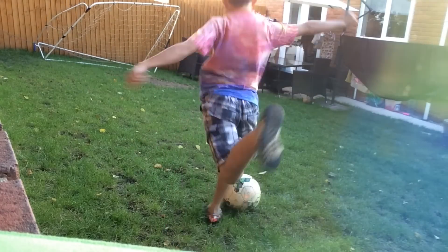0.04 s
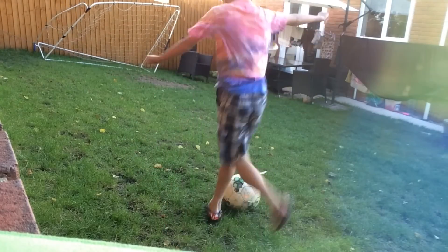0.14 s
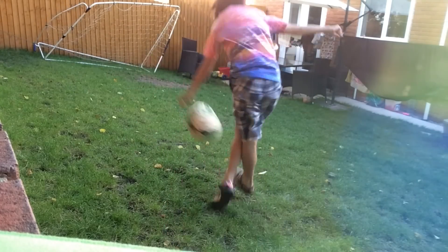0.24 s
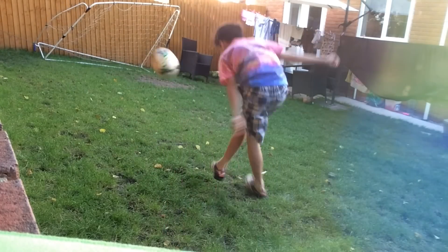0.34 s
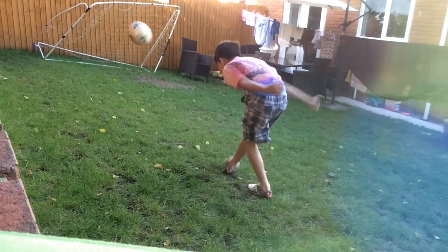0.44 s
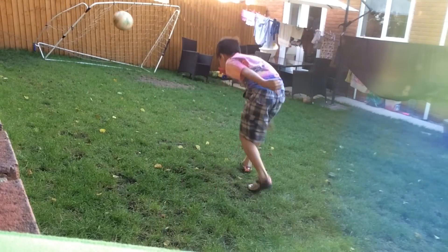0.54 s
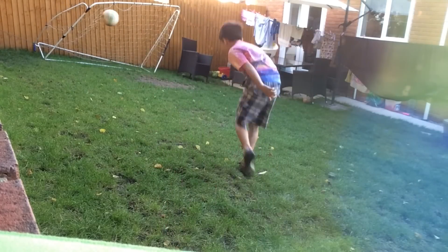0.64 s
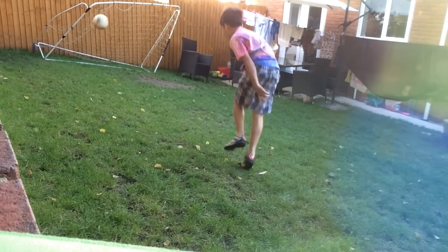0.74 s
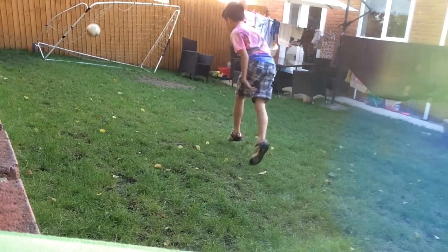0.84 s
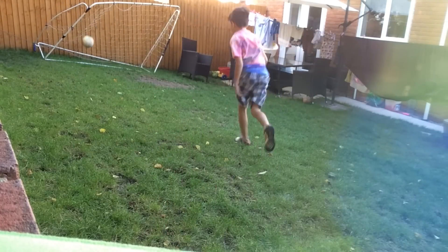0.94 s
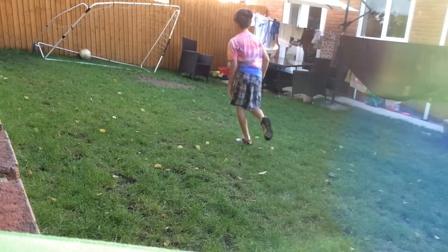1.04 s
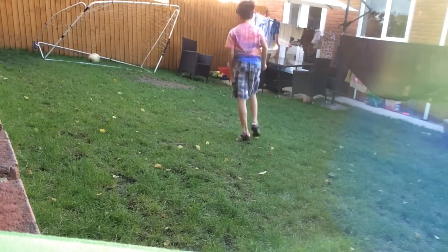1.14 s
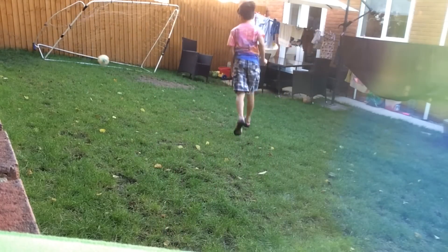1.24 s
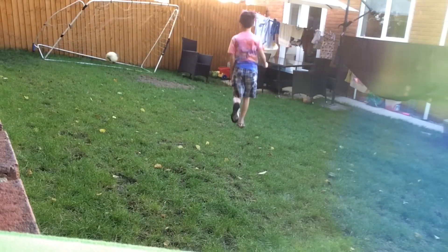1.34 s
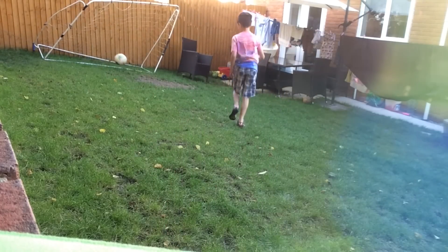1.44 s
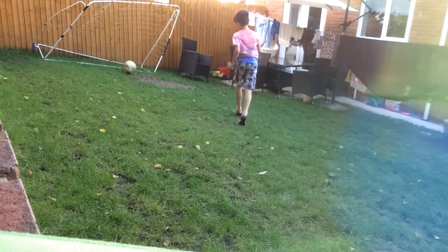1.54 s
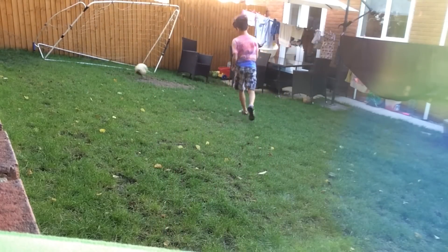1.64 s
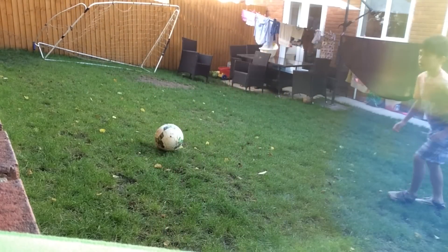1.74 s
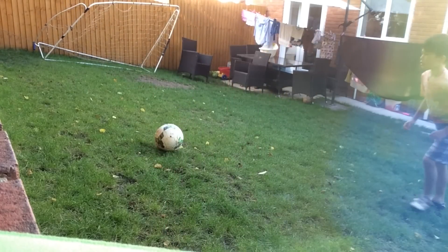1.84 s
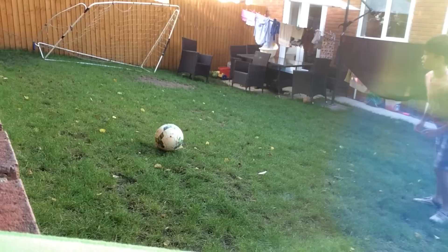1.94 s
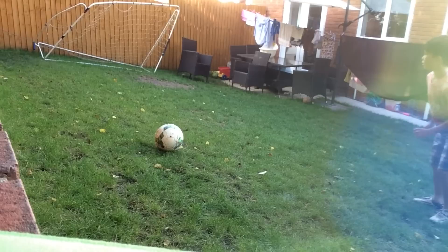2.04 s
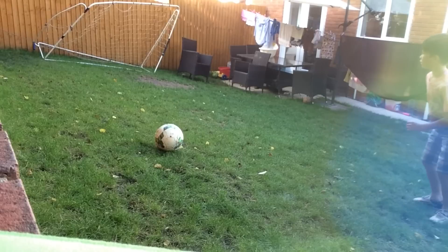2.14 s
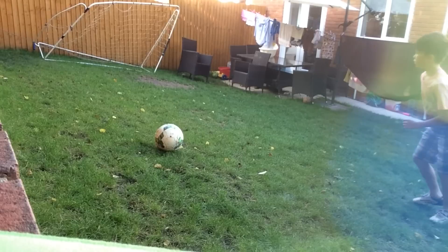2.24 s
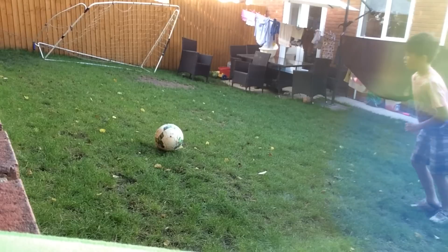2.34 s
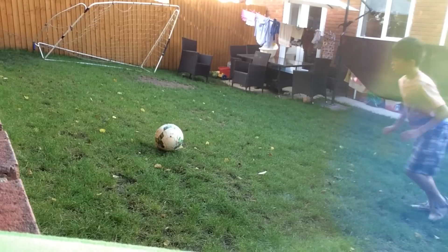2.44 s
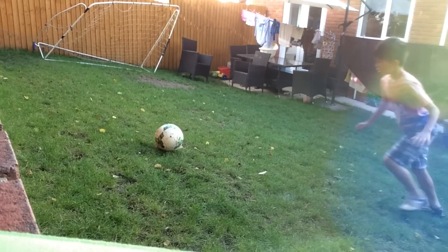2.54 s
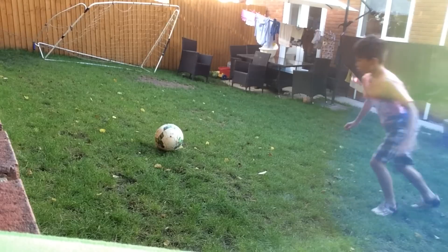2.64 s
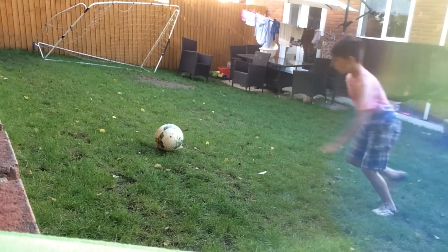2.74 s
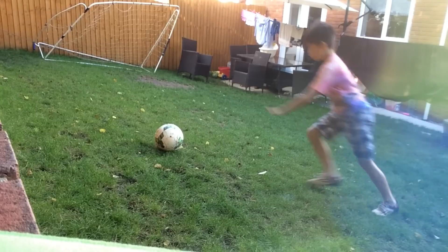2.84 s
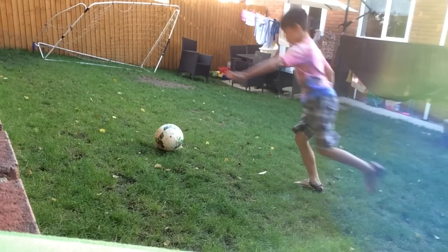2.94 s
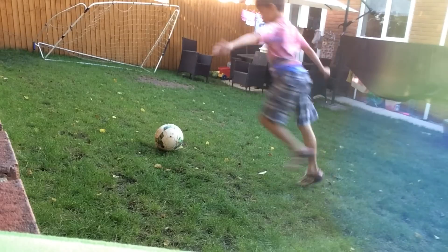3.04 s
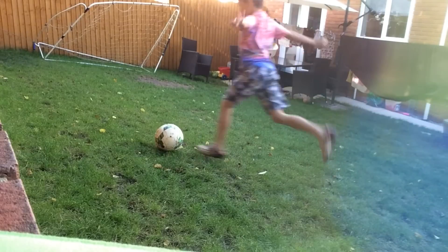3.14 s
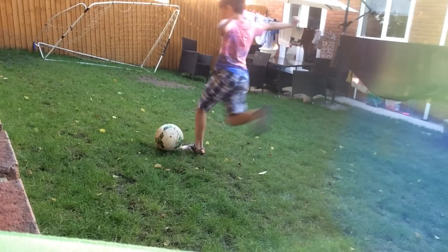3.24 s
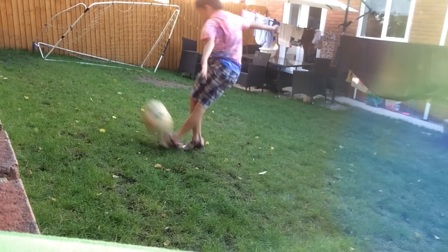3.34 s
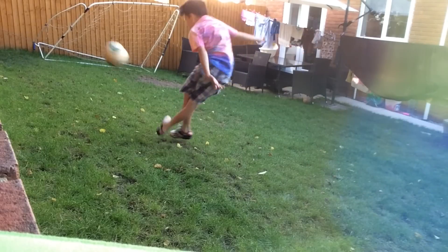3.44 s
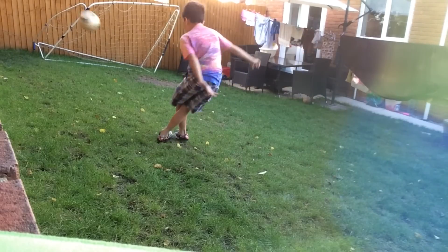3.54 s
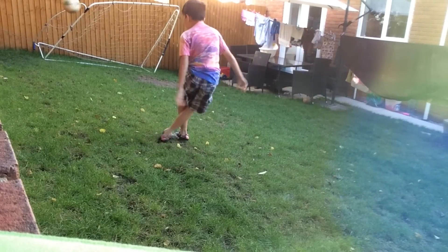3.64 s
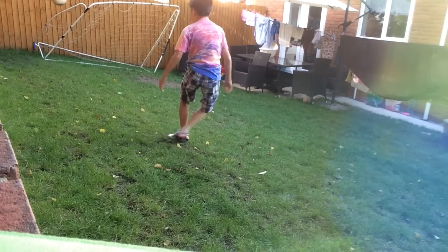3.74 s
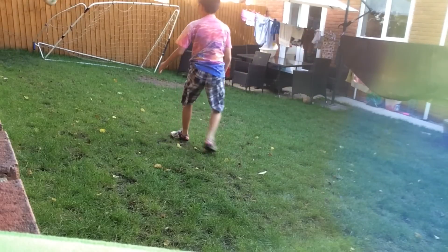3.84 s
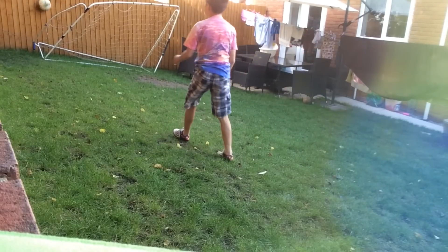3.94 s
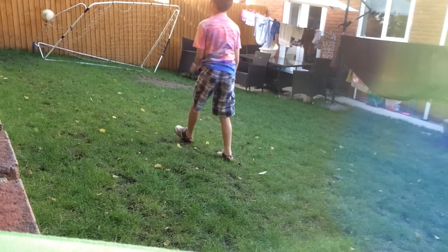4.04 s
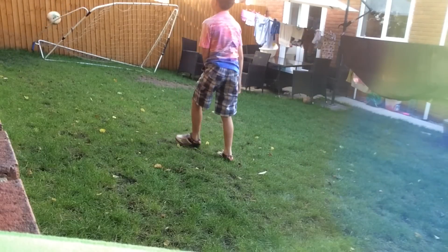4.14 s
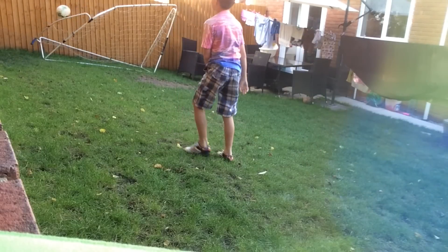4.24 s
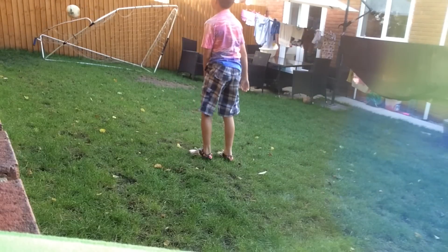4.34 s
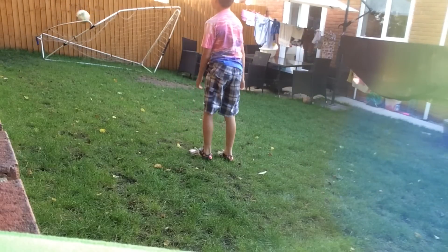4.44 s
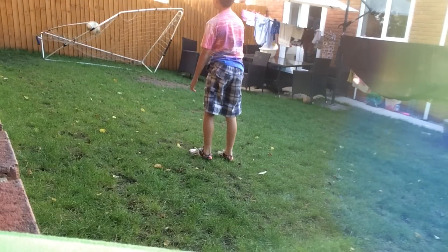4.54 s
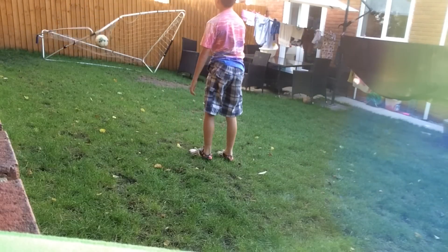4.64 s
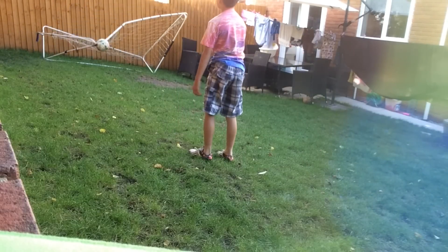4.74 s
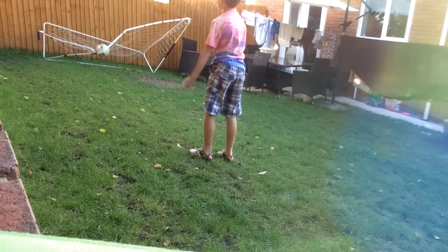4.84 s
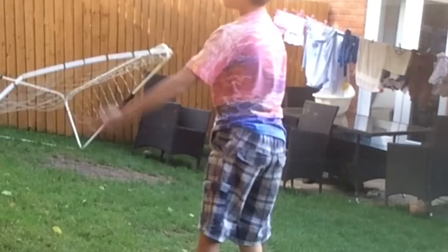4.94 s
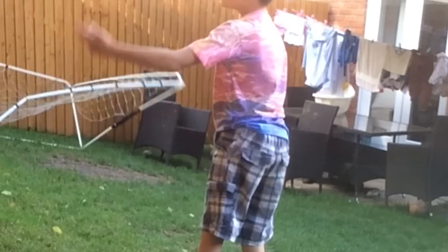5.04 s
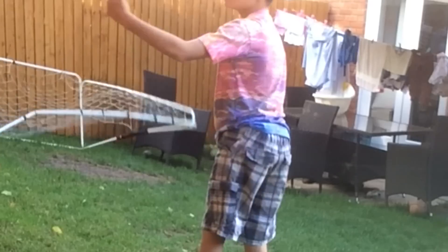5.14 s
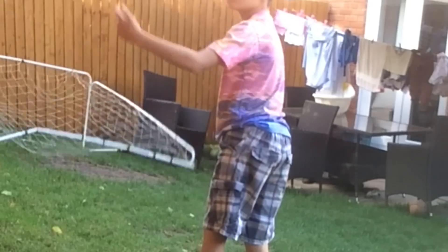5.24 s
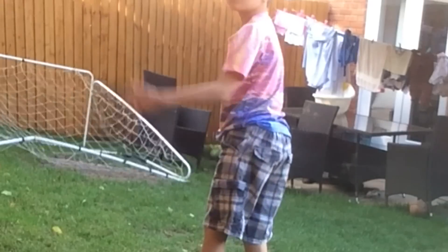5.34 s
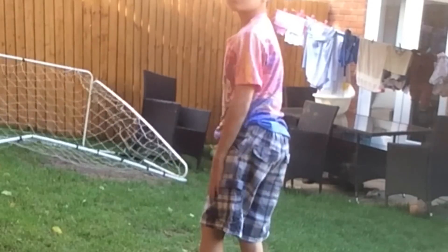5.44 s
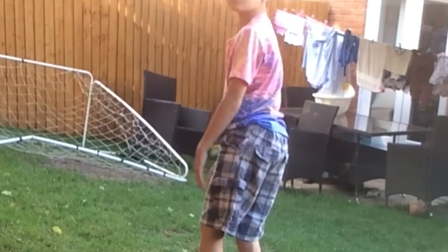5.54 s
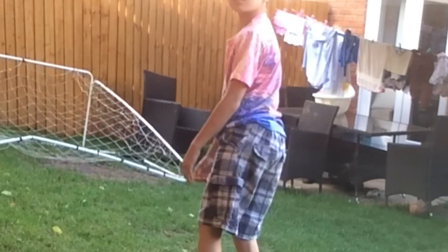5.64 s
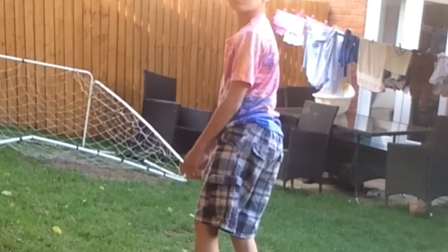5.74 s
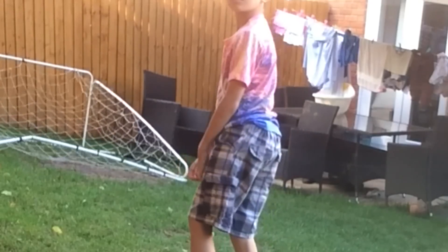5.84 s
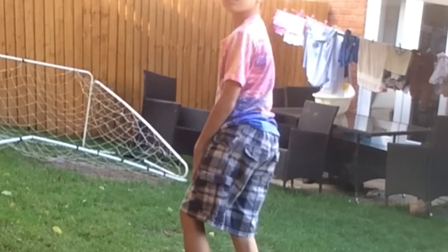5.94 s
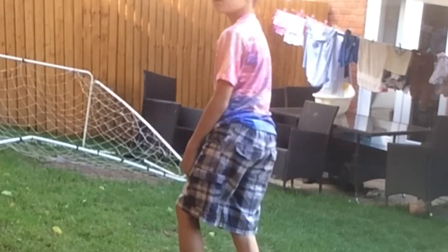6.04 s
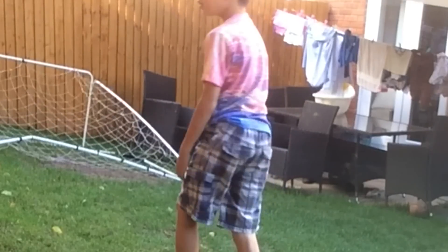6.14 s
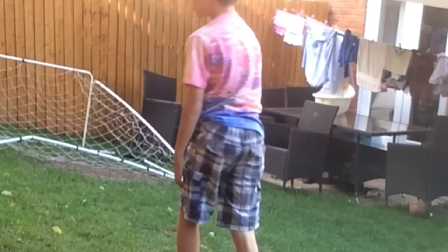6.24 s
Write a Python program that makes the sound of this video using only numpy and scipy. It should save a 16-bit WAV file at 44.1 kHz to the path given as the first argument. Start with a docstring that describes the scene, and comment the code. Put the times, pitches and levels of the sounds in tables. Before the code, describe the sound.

Soft footfalls on a lawn open the scene, and at 0.3 seconds a football is kicked a few metres away with a loud, leathery punch. The ball swishes through a net at about 1 second and bangs into a wooden fence at 1.2, the boards booming and chattering briefly. Quiet steps and grass rustles follow, with a heel scuff near 3 seconds. A second hard kick lands at 3.4, and the fence booms and rattles again at 4.1. The ball drops onto a light plastic goal with a swish of netting at 4.2; the goal creeps over with small ticks, then topples with scrapes and hollow clacks between 5.1 and 5.6 seconds. Walls and fences add a short echo. A faint town hum runs underneath, with two faint low toots, at the start and at 2.5 seconds, and barely audible bird whistles near 2.4 and 5.9.

```python
"""Soft footfalls on a back-garden lawn, then the punch of a football kicked a few metres away. The ball
brushes a net and bangs into a wooden fence, whose boards boom and chatter. A heel scuffs; kicked again,
the ball hits the fence and drops onto a light plastic goal, which topples with hollow clacks and scrapes.
Walls and fences echo; behind it all are two faint birds, two low toots and the hum of a town. The level
dips briefly between the kicks."""
import sys
import numpy as np
from scipy import signal
from scipy.fft import rfft, irfft
from scipy.io import wavfile
from scipy.ndimage import uniform_filter1d

SR = 44100
rng = np.random.default_rng(int(sys.argv[2]) if len(sys.argv) > 2 else 0)


def materialize(psi):
    """Save the field psi as 16-bit PCM at rate SR to the path in sys.argv[1].

    A 1-D psi becomes a single channel; in a 2-D psi each row is a channel.
    """
    bounded = np.clip(np.atleast_2d(psi).T, -1, 1)
    quanta = np.round(bounded * 32767).astype(np.int16)
    wavfile.write(sys.argv[1], SR, quanta)


N = 277830
T = np.arange(N) / SR

# boot meets ball: (time [s], level [dB], crack [dB])
KICKS = [(0.2769, -6, -28.5), (3.4356, -5.5, -27)]
# feet, ball and goal frame land on turf: (time [s], level [dB], pitch [Hz], scuff [dB], grass [dB])
LANDINGS = [(0.121, -36.5, 340, -50.5, -49.5), (0.134, -27.5, 105, -63, -78), (0.245, -43, 83.4, -44, -57),
            (0.459, -35.5, 72, -61, -63), (1.041, -41.5, 163, -54.5, -65.5), (1.699, -42, 287, -59, -68),
            (2.756, -32.5, 107.2, -55.5, -61.5), (2.98, -30.5, 426, -41, -54.5), (2.989, -33, 82, -62, -57),
            (3.011, -39, 79, -63, -71), (3.315, -36, 86, -56, -59.5), (3.599, -26.5, 93, -46, -54.5),
            (5.155, -36, 160, -52.5, -63.5), (5.436, -32.5, 255, -46.5, -50),
            (5.556, -33, 93.6, -44.5, -56)]
LEAF_HZ = 10700  # thin blades and cords give little above this


def undb(db):
    return 10 ** (np.asarray(db) / 20)


def unit(x):
    return x / np.sqrt(np.mean(x ** 2))


def add(out, x, s):
    """Mix x into out from time s on."""
    i = int(s * SR)
    out[i:i + len(x)] += x[:N - i]


def fade(t60, size):
    return 10 ** (-3 * np.arange(size) / SR / max(t60, .002))


def ring(modes, size):
    """Sum of decaying modes after an instant blow."""
    t = np.arange(size) / SR
    return sum(undb(db) * fade(t60, size) * np.sin(2 * np.pi * hz * t) for hz, db, t60 in modes)


def push(x, contact_ms):
    """A softer contact pushes for longer and dulls the ring; peak 1."""
    y = signal.fftconvolve(x, np.hanning(int(contact_ms * SR / 1000) + 3))
    return y / np.abs(y).max()


def colour(gain, size):
    """Noise of rms 1 with the given gain against frequency."""
    hz = np.maximum(np.fft.rfftfreq(size, 1 / SR), 1)
    return unit(irfft(rfft(rng.standard_normal(size)) * gain(hz), size))


def shape(table):
    """Gain against frequency from (frequency [Hz], level [dB]) points."""
    hz, db = np.transpose(table)
    return lambda f: undb(np.interp(np.log(f), np.log(hz), db))


def hump(centre_hz, octaves):
    return lambda f: np.exp(-.5 * (np.log2(f / centre_hz) / octaves) ** 2)


def walk(rate_hz, size):
    """Slewed random levels with a spread near 1."""
    hold = int(SR / rate_hz)
    steps = np.repeat(rng.standard_normal(size // hold + 1), hold)
    return 1.09 * uniform_filter1d(steps, hold)[:size]


def burst(rise, t60, centre_hz, octaves, size):
    """Noise that swells, then dies away."""
    n = int(rise * SR)
    envelope = np.r_[np.hanning(2 * n)[:n], fade(t60, size - n)]
    return envelope * colour(hump(centre_hz, octaves), size)


def rustle(db, rise, t60, centre_hz, octaves):
    """Grainy hiss of blades or cords sliding and snapping, singly and in tufts."""
    size = SR // 2
    grain_db = 2 * walk(1500, size) - .5 * walk(140, size)
    return undb(db + grain_db) * burst(rise, t60, centre_hz, octaves, size)


def whistles(notes):
    """Gliding tones, blurred and fluttering over the distance."""
    out = np.zeros(N)
    for s, length, first_hz, last_hz, db in notes:
        n = int(length * SR)
        hz = np.linspace(first_hz, last_hz, n) * (1 + .0102 * walk(40, n))
        flutter = walk(.02 * first_hz, n) + 1j * walk(.02 * first_hz, n)
        tone = (flutter * np.exp(2j * np.pi * np.cumsum(hz) / SR)).imag
        add(out, undb(db) * np.sqrt(np.hanning(n)) * tone, s)
    return out


def town():
    """A bed of far traffic and air: narrow bands swell together and flicker alone, most in the mids."""
    # tone of the hum: (frequency [Hz], level [dB])
    spectrum = [(12, -36), (20, -17), (60, 1), (113, -5.5), (172, -15), (262, -18), (285, -20), (388, -18),
                (422, -21.5), (897, -26), (2530, -37), (13900, -46.5), (16000, -51.5)]
    # slow ride of the bed: (time [s], level [dB])
    ride = [(0, -56), (.9, -57), (1.7, -53.5), (2.0, -56.5), (2.6, -57), (4.0, -55), (5.0, -57.5),
            (5.7, -57), (6.3, -57)]
    out, swell_db = np.zeros(N), 1.3 * walk(1.4, N)
    hz = np.maximum(np.fft.rfftfreq(N, 1 / SR), 1)
    hum = rfft(rng.standard_normal(N)) * shape(spectrum)(hz)
    for octave in np.arange(4, 14.6, 1 / 3):
        band = np.clip(1 - 3 * np.abs(np.log2(hz) - octave), 0, 1)
        flicker_db = 2.9 * hump(500, 2.6)(2 ** octave) * walk(4.9, N)
        out += irfft(hum * band, N) * undb(swell_db + flicker_db)
    return unit(out) * undb(np.interp(T, *np.transpose(ride)))


def toots():
    """Two faint low toots, each sagging in pitch."""
    # toots: (time [s], length [s], first pitch [Hz], last pitch [Hz], level [dB])
    notes = [(0.0, 0.052, 513, 450, -56), (2.46, 0.12, 482.6, 442, -62.5)]
    return whistles(notes)


def grass():
    """Blades bend just ahead of each landing and kick, and hiss under dragged soles."""
    # soles drag over grass: (time [s], level [dB], rise [s], t60 [s])
    drags = [(.52, -59.5, .005, 0.62), (.58, -62.5, .04, .3), (1.685, -60.5, 0.042, 0.2),
             (1.86, -66, .039, 0.66), (2.011, -62, .03, 0.21), (3.13, -68.5, .03, .12),
             (3.831, -68.5, .017, .14), (3.976, -58.5, .005, 0.21), (6.102, -73, .03, 0.27)]
    treads = [(s - .01, db, .01, .11) for s, *_, db in LANDINGS]
    boot_sweeps = [(s - .015, -46.5, .01, .23) for s, *_ in KICKS]
    out = np.zeros(N)
    for s, db, rise, t60 in treads + boot_sweeps + list(drags):
        add(out, rustle(db, rise, t60, centre_hz=5500, octaves=6), s)
    tufts = undb(1.8 * walk(70, N))  # the lawn gives way unevenly
    return signal.lfilter(*signal.butter(1, LEAF_HZ, fs=SR), out * tufts)


def thuds():
    """Turf is a heavily damped drum; each landing scuffs it too."""
    out, size = np.zeros(N), SR // 4
    t60, scuff_rise_s = .046, .00924
    for s, db, hz, scuff_db, _ in LANDINGS:
        drum = ring([(hz, 0, t60), (1.9 * hz, -6, .75 * t60)], size)
        add(out, undb(db) * push(drum, contact_ms=3.5), s)
        add(out, undb(scuff_db) * burst(scuff_rise_s, t60, 507, .88, size), s - scuff_rise_s / 2)
    return out


def clacks():
    """Dry clacks of hollow plastic: two blurred rings over a wide snap."""
    # poles, joints and studs knock: (time [s], level [dB], pitch [Hz], t60 [s])
    hits = [(0.154, -57, 5900, 0.013), (3.018, -54, 1920, 0.017), (3.241, -63, 1700, .015),
            (3.5231, -46.5, 2454, .009), (3.536, -57, 5260, 0.0093), (3.5514, -61.5, 3500, .015),
            (4.696, -64, 3530, 0.037), (4.79, -56.5, 2130, 0.025), (4.827, -52.5, 3620, .04),
            (5.1543, -46, 3330, 0.031), (5.2167, -56, 5150, 0.018), (5.223, -36.5, 2420, .019),
            (5.437, -39.5, 2020, 0.046), (5.4514, -53, 2020, .03), (5.5596, -36, 930, 0.016)]
    out, size, rise_s = np.zeros(N), SR // 10, .0028
    for s, db, hz, t60 in hits:
        body = burst(rise_s, t60, hz, .32, size)
        overtone = undb(-3) * burst(rise_s, t60, 2 * hz, .56, size)
        snap = undb(-6) * burst(rise_s, t60, 2200, 2.3, size)
        add(out, undb(db) * (body + overtone + snap), s - rise_s / 2)
    return out


def kicks():
    """A suck of air, the ball squashed on the boot with a leathery crack, then a ringing rebound."""
    # modes of the ball: (frequency [Hz], level [dB], t60 [s])
    ball = [(87.3, -10.5, 0.093), (173, -18.5, 0.14), (251, -17, 0.024), (319, -19.5, 0.017),
            (437, -12, 0.015), (668, -15, 0.015), (790, -24.5, 0.047), (1680, -18.5, 0.018)]
    out, size = np.zeros(N), SR // 4
    contact_s, suck_lead_s = .0172, 830 / SR
    soft = np.hanning(40) / np.hanning(40).sum()  # skin and leather round every edge
    suck = np.convolve(-undb(-2) * fade(.021, 800)[::-1], soft)
    press = np.convolve(ring([(74, 0, .35)], int(contact_s * SR)), soft)  # ball and boot as one spring
    slap = np.convolve(ring(ball[1:], size), soft)
    rebound = -np.convolve(ring(ball, size), soft)  # an opposite jolt as the ball springs off
    for s, db, crack_db in KICKS:
        add(out, undb(db) * suck, s - suck_lead_s)
        add(out, undb(db) * press, s)
        add(out, undb(db + 6.5) * slap, s)
        add(out, undb(db + 4.5) * rebound, s + contact_s)
        add(out, undb(crack_db) * burst(.00063, .014, 3400, 1.05, size), s - .001)
        add(out, undb(crack_db - 16.5) * burst(.0065, .14, 2000, .94, size), s)  # torn grass flies
        add(out, undb(crack_db - 17) * burst(.0013, .028, 3300, 1.7, size), s + contact_s)
    return out


def goal_and_heel_scrapes():
    """Net and frame swish, ringing the hollow poles; a heel scuffs the turf before the second kick."""
    # net and frame scrapes, and the heel scuff at 2.977 s:
    # (time [s], level [dB], rise [s], t60 [s], centre [Hz], width [octaves])
    swishes = [(1.034, -53, 0.029, 1, 3150, 1.4), (1.057, -49, .022, 0.65, 4030, 0.36),
               (2.977, -40.5, .005, .07, 570, 0.32), (3.53, -63.5, 0.0091, 0.2, 5000, .55),
               (4.20, -39, .026, 0.29, 3430, 1.45), (4.361, -53, 0.042, 0.32, 3350, 1.63),
               (4.693, -61, 0.012, 0.57, 3670, .85), (4.787, -53, 0.019, 0.42, 6000, 2.3),
               (4.825, -55, 0.013, 0.27, 3350, 0.51), (5.154, -51.5, .003, 0.72, 3240, 1.7),
               (5.16, -53.5, 0.054, 1, 860, 1.5), (5.214, -43, 0.016, 0.23, 2680, 1.54),
               (5.301, -56, 0.11, 0.5, 790, 1.6), (5.418, -38, 0.048, 0.21, 4000, 2.1),
               (5.555, -55, 0.013, 0.4, 2550, 2.3)]
    # pole resonances: (frequency [Hz], width [Hz], level [dB])
    poles = [(2020, 170, 0), (3313, 210, -4), (3670, 26, -4), (5000, 230, -4), (5530, 26, -3),
             (6170, 32, -5.5), (6850, 50, -4.5)]
    scrapes = np.zeros(N)
    for s, db, rise, t60, centre_hz, octaves in swishes:
        add(scrapes, rustle(db, rise, t60, centre_hz, octaves), s)
    rings = sum(undb(db) * signal.lfilter(*signal.iirpeak(hz, hz / width, fs=SR), scrapes)
                for hz, width, db in poles)
    return signal.lfilter(*signal.butter(1, LEAF_HZ, fs=SR), scrapes + undb(-2) * rings)


def fence():
    """Each blow rings the boards a little differently; they knock and chatter on against their rails."""
    # ball and loose boards strike:
    # (time [s], level [dB], contact [ms], low cut [Hz], knocking t60 [s], rattle [dB])
    bangs = [(1.154, -14.5, 1.4, 70, .042, -38.5), (1.1686, -1.5, 0.93, 132, 0.17, -15.5),
             (1.190, -7, 1.17, 120, 0.19, -28), (1.223, -8.5, 3.2, 85.5, 0.12, -40.5),
             (4.062, -25, 6.7, 45, .05, -46), (4.0723, -2, 1.85, 44.6, 0.13, -21),
             (4.087, -11, 0.76, 60, 0.42, -17.5), (4.107, -7, 1.16, 50, 0.42, -30),
             (4.16, -13.5, 3.76, 60, 0.4, -40.5)]
    # modes of the boards: (frequency [Hz], level [dB], t60 [s])
    boards = [(62, -7, 0.16), (88.5, -5.5, 0.12), (111, -1.5, 0.14), (167.6, 2.5, 0.1), (218, 1, 0.082),
              (267, -2.5, 0.061), (322, -14.5, 0.12), (395, -8, 0.068), (447, -6.5, 0.053),
              (540.6, -8, 0.042), (635, -7, 0.13), (644, -13.5, 0.037), (817, -10, 0.018),
              (924, -13, 0.034), (1191, -10, 0.051), (1640, -18, .05), (2120, -25.5, .04), (3000, -23, .04)]
    # tone of the chatter: (frequency [Hz], level [dB])
    rattle = [(180, -23), (300, 1), (913, -9.5), (1250, -18.5), (1650, -13), (2520, -21.5), (3170, -19),
              (4390, -22.5), (15000, -53)]
    out, size = np.zeros(N), SR // 2
    panel_hz, knocks_per_s, rattle_t60 = 193, 160, .29
    for s, db, contact_ms, low_hz, knock_t60, rattle_db in bangs:
        # near a post: less bass, more boom from the single panel, brighter chatter
        stiffness = np.log2(low_hz / 60)
        spot = rng.standard_normal((len(boards), 2))  # where the blow lands shifts the modes
        modes = []
        for (hz, mode_db, t60), (detune, accent) in zip(boards, spot):
            boom_db = 4 * stiffness * hump(panel_hz, .4)(hz)
            modes.append((hz * (1 + .042 * detune), mode_db + 3 * accent + boom_db, t60))
        wood = signal.sosfilt(signal.butter(2, low_hz, "high", fs=SR, output="sos"), ring(modes, size))
        knocks = undb(-7) * fade(knock_t60, size) * rng.standard_normal(size)
        knocks *= rng.random(size) < knocks_per_s / SR
        blows = signal.lfilter(*signal.butter(1, 445.4, fs=SR), knocks)  # softer knocks are duller
        blows[0] = 1  # the main hit
        add(out, undb(db) * signal.fftconvolve(blows, push(wood, contact_ms)), s)
        chatter = colour(lambda f: shape(rattle)(f) * undb(1.23 * stiffness * np.log2(f / 1000)), size)
        add(out, undb(rattle_db + 1.88 * walk(300, size)) * fade(rattle_t60, size) * chatter, s)
    return out


def birds():
    """Two thin, distant bird whistles."""
    # calls: (time [s], length [s], first pitch [Hz], last pitch [Hz], level [dB])
    calls = [(2.38, .36, 3900, 4400, -85), (5.92, .09, 8600, 8400, -79)]
    return whistles(calls)


def garden_echo(x):
    """Walls and fences return a diffuse tail, longest in the low mids."""
    # bands of the tail: (centre [Hz], t60 [s], level [dB])
    bands = [(61.2, 0.19, -1), (160, 0.41, 4), (422, 0.42, 1.5), (1100, 0.27, -1), (2806, 0.38, -4),
             (7600, 0.09, -7.5)]
    size, predelay_s, wet_db = SR // 2, .012, -14
    tail = sum(undb(db) * fade(t60, size) * colour(hump(hz, .74), size) * np.sqrt(hz / t60)
               for hz, t60, db in bands)
    response = np.r_[np.zeros(int(predelay_s * SR)), unit(tail) / np.sqrt(size)]
    return undb(wet_db) * signal.fftconvolve(x, response)[:N]


def scene():
    """The nearby kicks sit drier than the rest of the lawn, over the distant background."""
    boot = kicks()
    lawn = fence() + thuds() + clacks() + grass() + goal_and_heel_scrapes()
    echo = garden_echo(undb(-3.5) * boot + lawn)
    return (boot + lawn + echo + birds() + toots() + town())[None]


def record(dry):
    """The level dips briefly; the microphone sheds deep bass, rounds the peaks and cuts the top."""
    dip_s, dip_width_s, dip_db = 1.762, .011, -18
    dip = undb(dip_db * np.exp(-.5 * ((T - dip_s) / dip_width_s) ** 2))
    x = signal.sosfilt(signal.butter(3, 40, "high", fs=SR, output="sos"), dry * dip)
    x = x / (1 + np.abs(x / .95) ** 4) ** .25  # soft clip
    return signal.sosfilt(signal.ellip(10, .2, 60, 15600, fs=SR, output="sos"), x)


dry = scene()
out = record(dry)
materialize(out)
```